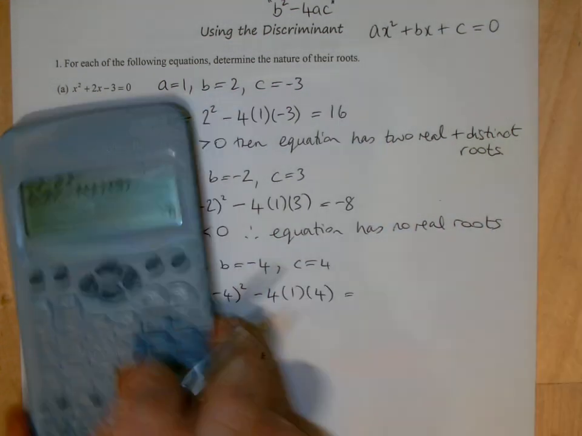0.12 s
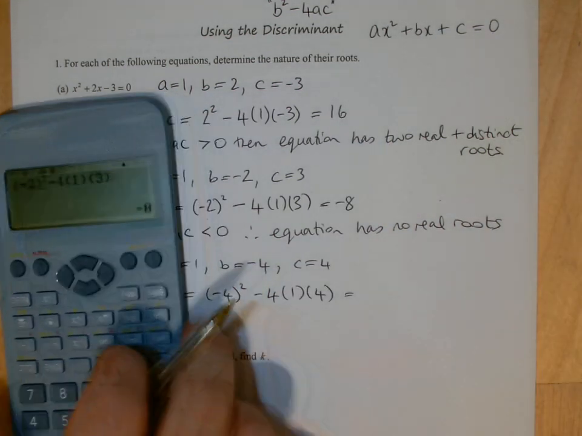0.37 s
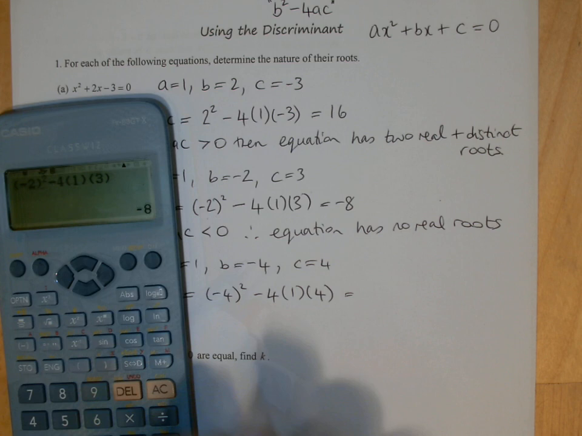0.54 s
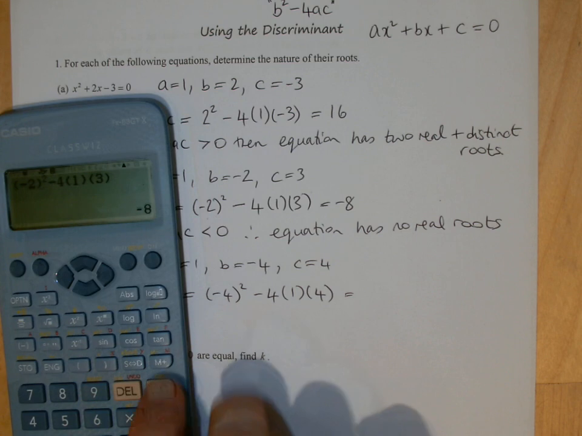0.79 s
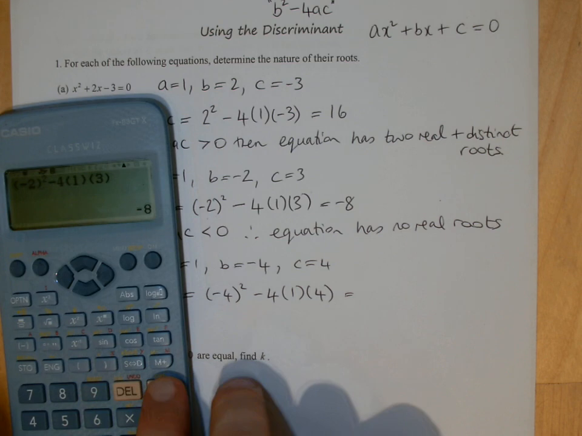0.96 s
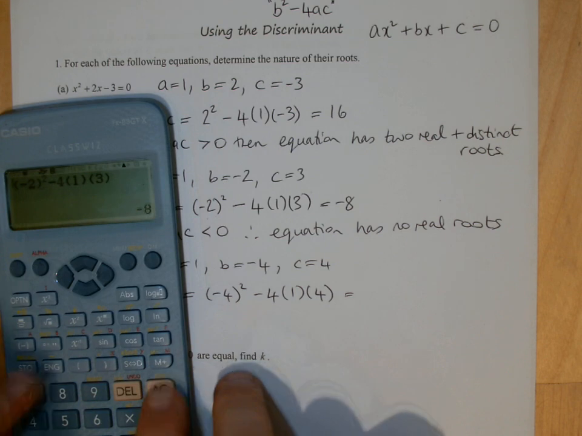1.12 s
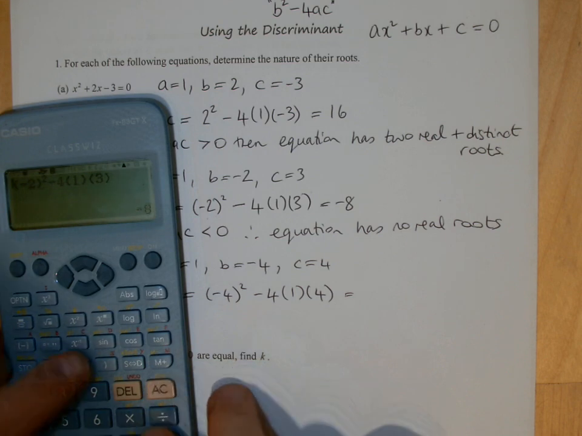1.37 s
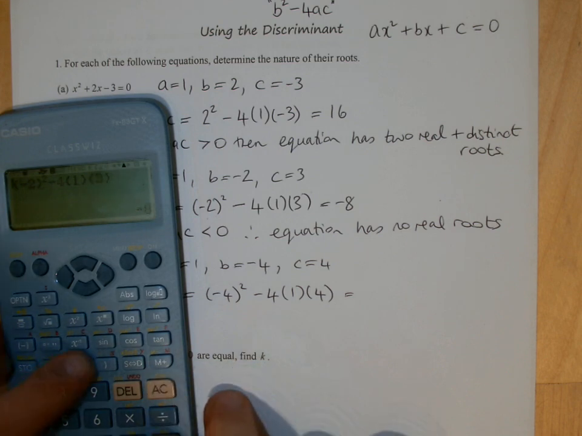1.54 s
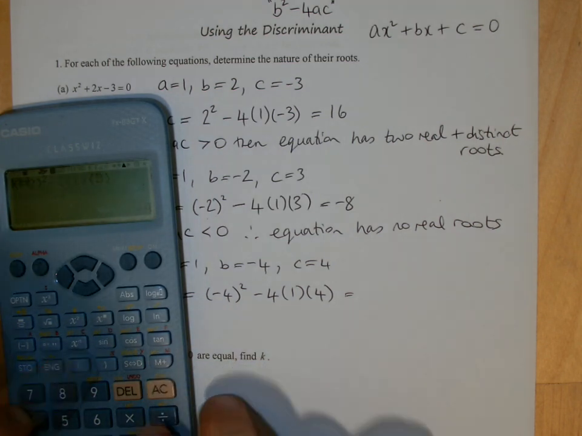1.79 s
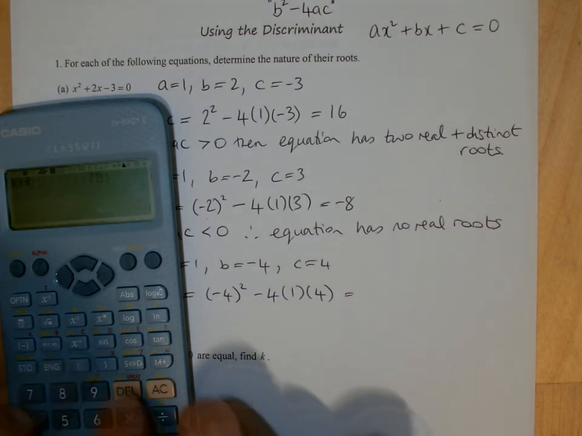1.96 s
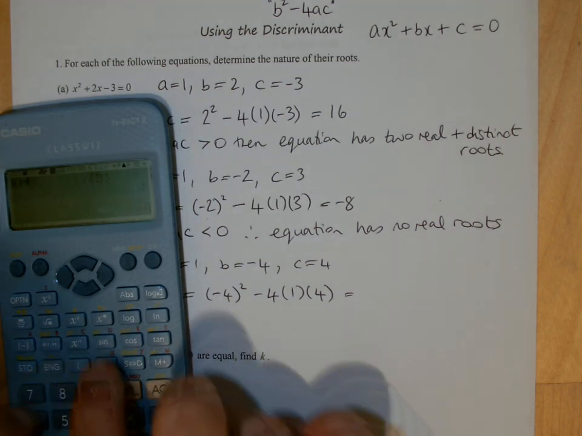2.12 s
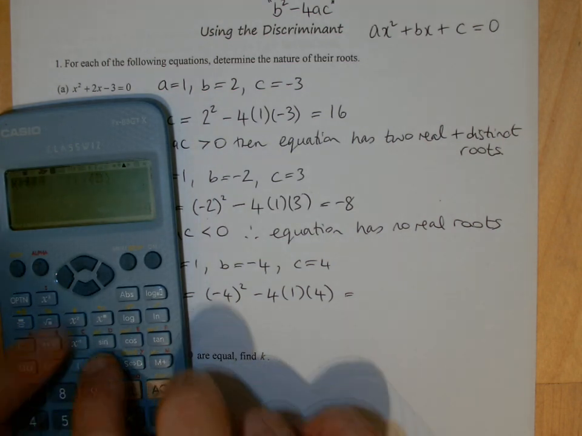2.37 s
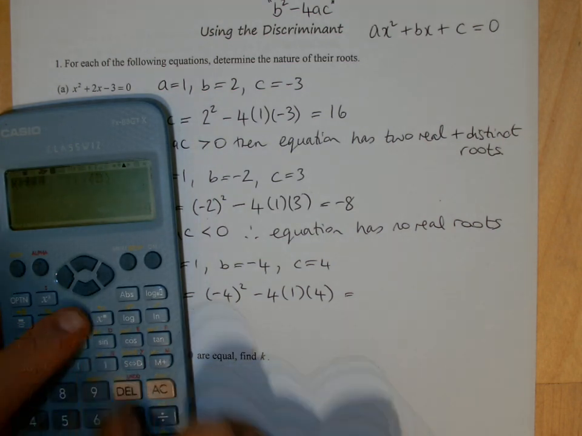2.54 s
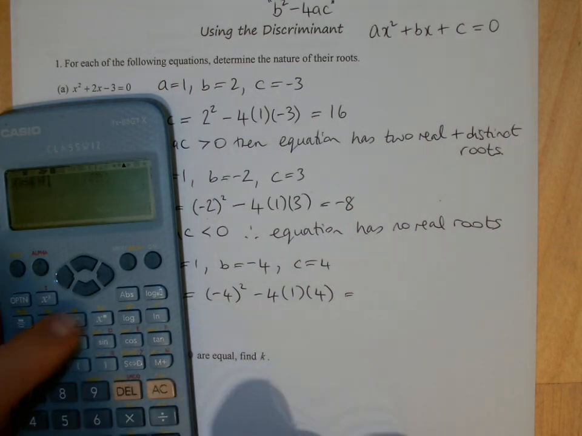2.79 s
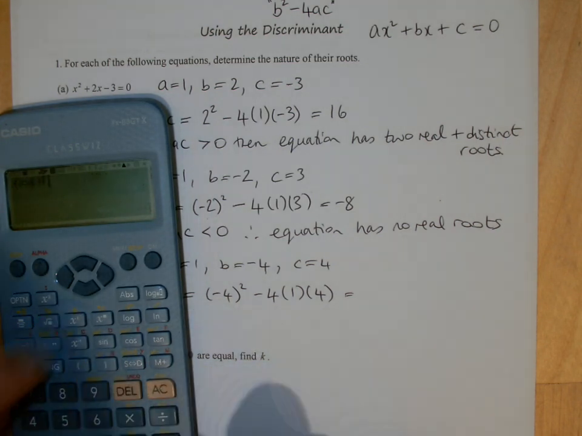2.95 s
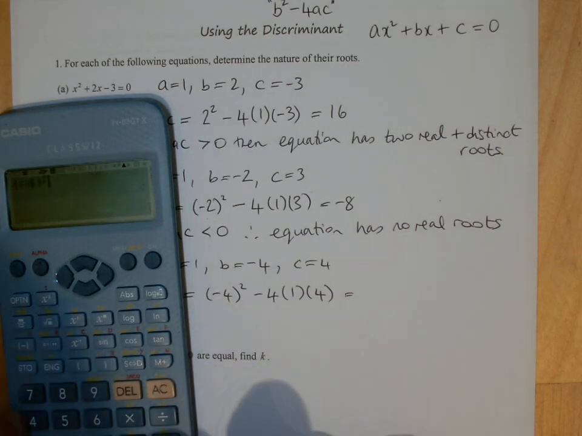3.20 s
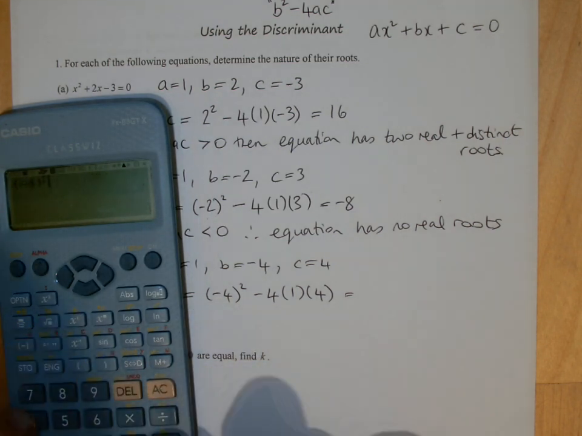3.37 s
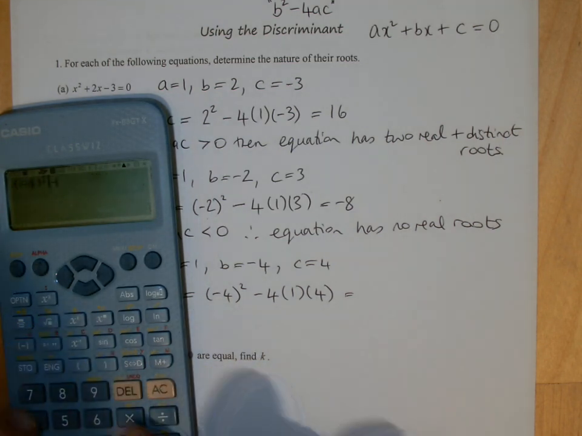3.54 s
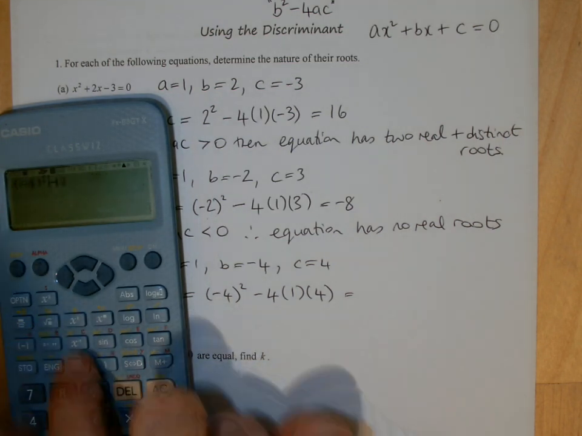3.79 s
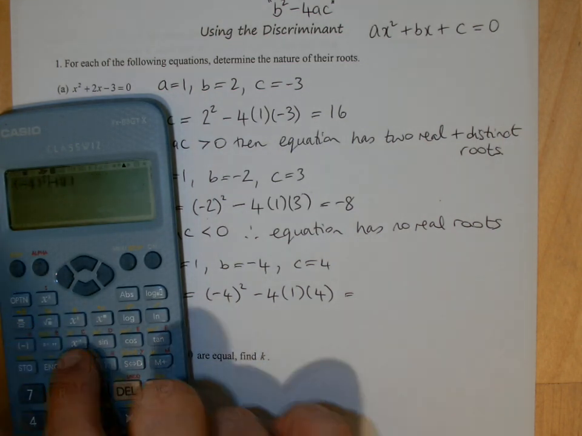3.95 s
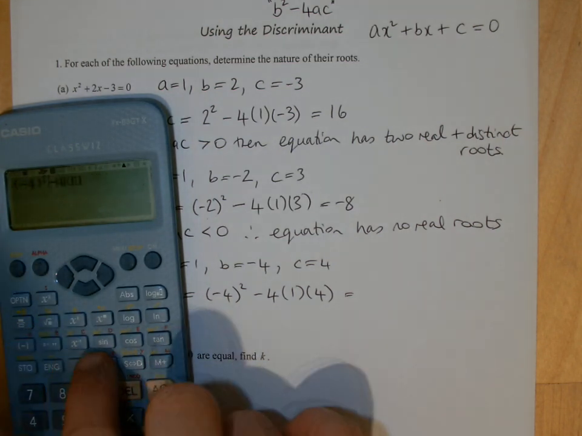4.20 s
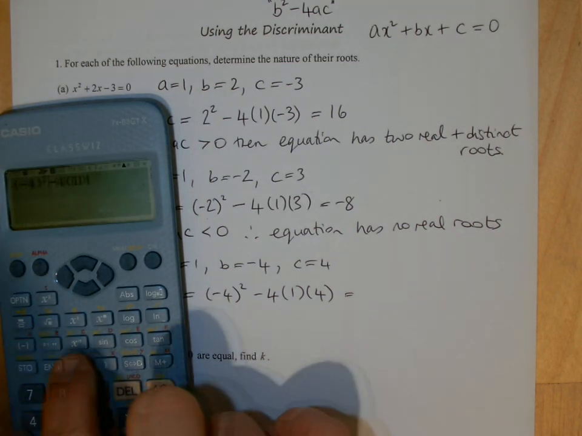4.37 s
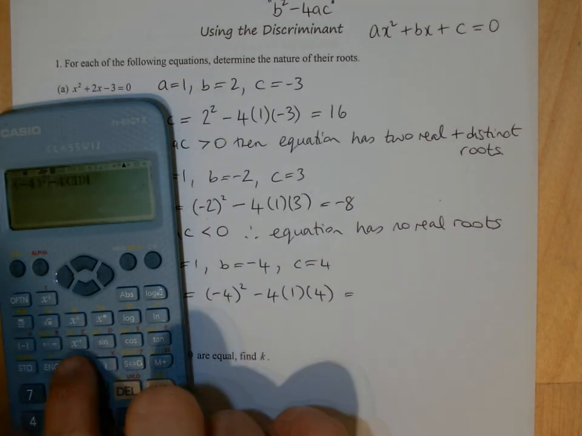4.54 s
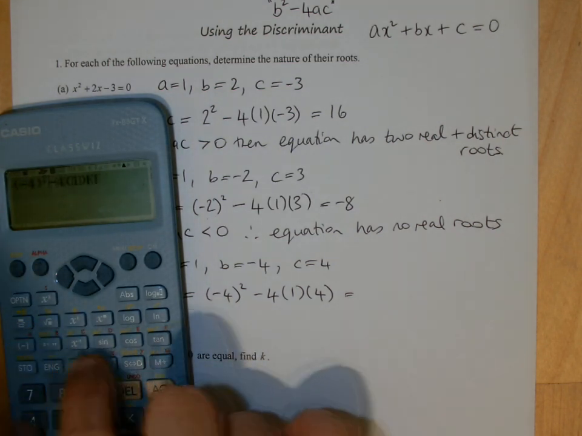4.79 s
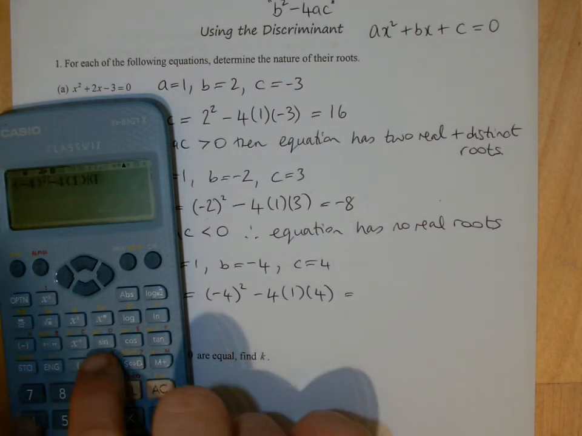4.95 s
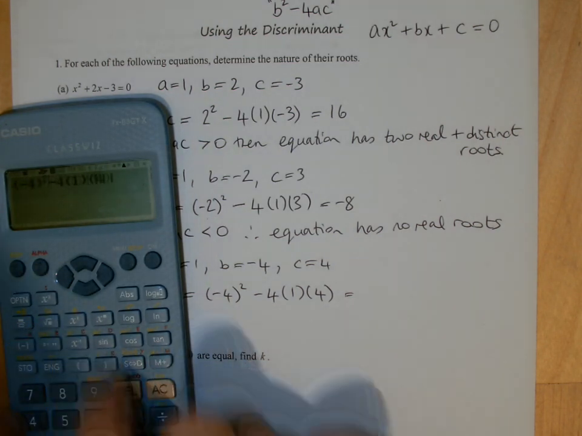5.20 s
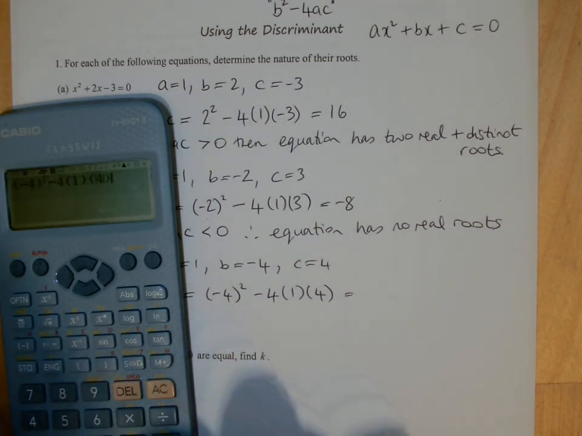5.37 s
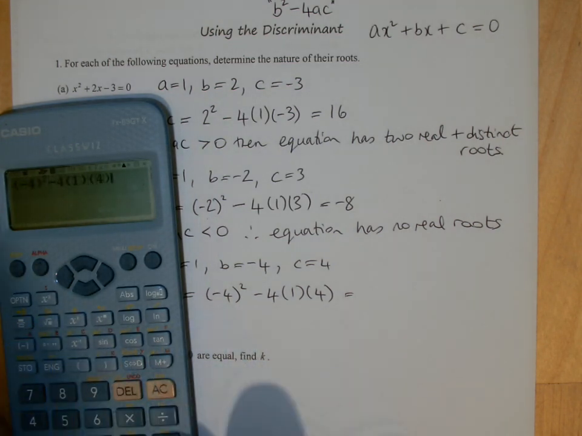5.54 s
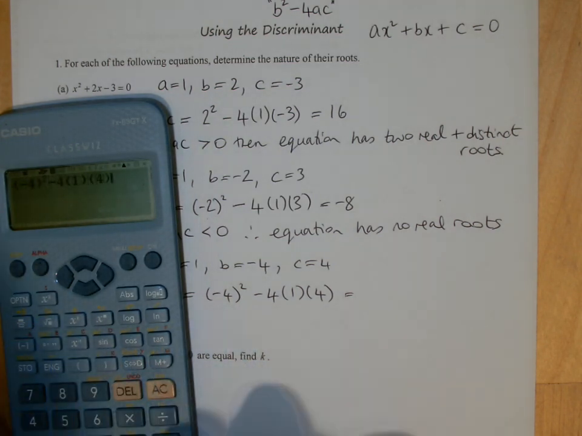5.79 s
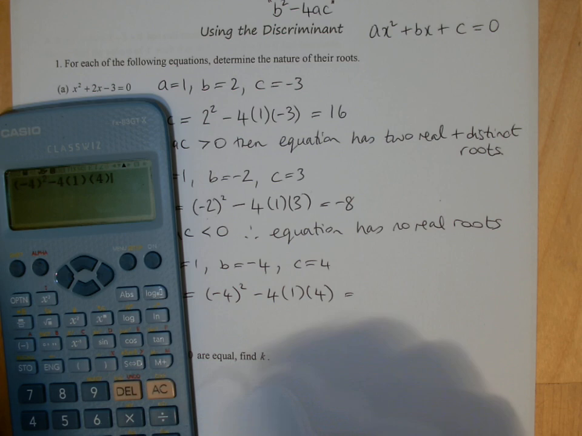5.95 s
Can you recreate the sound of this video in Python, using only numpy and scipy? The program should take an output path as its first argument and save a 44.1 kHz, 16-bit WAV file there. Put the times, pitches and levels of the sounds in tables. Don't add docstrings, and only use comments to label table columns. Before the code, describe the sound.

Close up in a small quiet room, a hard plastic case hits a wooden desk with a bright crack and short woody ring, followed a quarter second later by a lower, gentler thud. After a brief rustle of skin, fingers press cushioned buttons irregularly, giving faint dull bumps and small clicks on release. Soft rumble and steady hiss lie underneath, with a short room echo.

```python
import sys
import numpy as np
from scipy import signal
from scipy.fft import rfft, irfft
from scipy.io import wavfile

SR = 44100
rng = np.random.default_rng(int(sys.argv[2]) if len(sys.argv) > 2 else 0)


def transcribe(u):
    v = np.clip(np.atleast_2d(u).T, -1, 1)
    q = np.round(v * 32767).astype(np.int16)
    wavfile.write(sys.argv[1], SR, q)


N = 265923

# [f/Hz, level per Hz/dB]
FLOOR_SPECTRUM = [(10, -25), (20, 2.5), (64, -5), (130, -11.5), (310, -16), (500, -17.5), (600, -25),
                  (800, -23), (1000, -28), (2000, -32), (5000, -35), (9600, -36), (13000, -36),
                  (15800, -36.5)]
# [f/Hz, level/dB]
WHINES = [(1098, -82), (7989, -86.5), (12129, -101), (13770, -88)]
# [low f/Hz, high f/Hz, level/dB]
HISS_HUMPS = [(10730, 11750, -74), (11270, 11500, -75), (11940, 12300, -81)]
# [f/Hz, time to fall 60 dB/s, level/dB]
ROOM_ECHO = [(100, 0.45, -13), (249, 0.54, -3), (500, 0.37, -1.5), (2000, 0.52, 2), (6000, 0.38, 5.5),
             (15000, 0.13, -0.5)]
# [t of the quickest motion/s, level/dB]
SWEEPS = [
    (0, -58),
    (.3, -63),
    (.85, -64.5),
    (.95, -61.5),
    (1.4, -64.5),
    (3.9, -68),
]
# [f/Hz, level per Hz/dB]
RUSTLE_SPECTRUM = [(500, 8.5), (1500, -4.5), (2500, -1), (4500, -9), (6000, -10.5), (8500, -13.5),
                   (11000, -3.5), (16000, -19)]
# [f/Hz, level under top edge/dB, level under base/dB, level under finger/dB, time to fall 60 dB/s]
DESK_MODES = [(88.8, -2.5, -10.5, -25, 0.27), (117, -32, -9, -36, 0.12), (170.7, -17.5, -2.5, 1.5, 0.2),
              (232, -17, -23, -1.5, 0.044), (248.7, -16, -25, -10.5, 0.26), (315, -9, -9, -21, 0.1),
              (354.6, -16, -19, -7, 0.1), (419.3, -3.5, -6.5, -8.5, 0.14), (442.3, 1, -22, -1, 0.051),
              (522.3, -4, -1.5, -5, 0.1), (575, -32, -29, -33, 0.014), (725, -5, -9.5, -23, 0.063),
              (902, -4.5, 1, -4, 0.033), (967.7, -25.5, -18, -30, 0.15), (1100, -10, -7.5, -22, 0.039),
              (1280, -25, -34, -24, 0.017), (1540, -26, -26, -39, 0.043), (1910, -6.5, -15.5, -22, 0.023),
              (2485, -12.5, -13.5, -15, 0.022), (3900, -41, -7.5, -24, 0.018)]
# [t/s, blow level/dB, hardness f/Hz, crack level/dB]
EDGE_CONTACTS = [
    (.1235, -50.5, 2000, -49),
    (.1426, -14, 5000, -27),
    (.1443, -35, 5000, -26),
    (.1482, -14.5, 470, -61),
    (.156, -28.5, 430, -47),
]
# [t/s, blow level/dB, hardness f/Hz, crack level/dB]
BASE_CONTACTS = [
    (.3735, -47, 3000, -54),
    (.377, -34, 200, -70),
    (.3837, -20.5, 1800, -52),
    (.3868, -57, 3000, -28),
    (.392, -20, 397, -37),
    (.3965, -21.5, 410, -36),
    (.408, -37, 400, -51),
]
# [f/Hz, level per Hz/dB]
THUD_SPECTRUM = [(60, -7), (200, 15), (600, 9.5), (1200, -3.5), (2500, -15), (5000, -36), (16000, -105)]
# [f/Hz, level per Hz/dB]
CRACK_SPECTRUM = [(500, 8.5), (1500, -4.5), (3000, 1), (5000, -5.5), (8000, -9), (12000, -10), (16000, -30)]
# [t/s, thump level/dB, whole desk's sag level/dB, bottoming knock level/dB]
PUSHES = [(0.872, -45.5, -70, -64), (1.026, -60, -73, -80), (1.454, -41.5, -57, -52.5),
          (1.622, -54, -53, -63), (2.06, -47, -46.5, -50.5), (2.233, -44, -58, -62), (2.265, -45, -51, -48),
          (2.362, -48.5, -64, -71), (2.598, -47, -58, -66), (3.072, -52.5, -59, -72),
          (3.629, -43, -56, -73), (3.614, -47, -52, -52.5), (3.707, -56.5, -52.5, -79),
          (3.84, -42.5, -44.5, -48), (4.182, -43.5, -54, -56), (4.586, -43.5, -70, -53),
          (4.72, -55, -56.5, -79), (4.901, -56.5, -47, -54), (5.058, -45.5, -60, -54),
          (5.165, -48.5, -47.5, -81)]
# [t/s, tick level/dB, knock level/dB, cap f/Hz]
RELEASES = [(1.0157, -46, -50, 2700), (1.04, -47, -55, 2450), (1.344, -48, -55, 2660),
            (1.5693, -46, -48.5, 1590), (1.7281, -58, -50, 2700), (1.7602, -58, -67, 2400),
            (2.168, -53.5, -52, 1620), (2.1894, -56, -52.5, 1970), (2.366, -47, -50, 1950),
            (2.7206, -48, -51.5, 2700), (2.7352, -43.5, -55, 2520), (3.712, -55, -54.5, 2590),
            (3.7294, -61, -75, 1900), (3.9576, -50, -48.5, 2800), (3.9815, -58, -83, 2080),
            (4.2774, -55, -57, 2470), (4.295, -44.5, -50, 2280), (4.7165, -53, -45.5, 2540),
            (5.164, -46, -58, 1580), (5.1639, -45.5, -46, 1950)]
# [t/s, tick level/dB, knock level/dB, cap f/Hz]
TOUCHES = [(0.5488, -65, -75, 2120), (0.816, -49, -50, 2370), (1.3895, -64, -53, 2330),
           (3.0494, -45, -54.5, 2170), (3.0579, -47, -47, 2490), (3.1835, -46, -48.5, 1460),
           (3.2724, -52, -52, 2500), (3.3843, -55, -55, 2540), (3.428, -66, -49, 2200),
           (4.122, -49, -53, 2530), (4.2353, -52.5, -77, 4730), (4.7987, -55, -56, 2510),
           (4.999, -47, -44.5, 2610), (5.472, -60, -53, 1510), (5.5197, -70, -54.5, 1660)]
# [f/Hz, level/dB, time to fall 60 dB/s]
CAP_MODES = [(1170, -2, 0.055), (1600, -28.5, 0.0097), (1950, -11.5, 0.061), (2320, 3, 0.04),
             (2700, -4, 0.04), (3220, -7, 0.015), (3680, 9, 0.0099), (5020, -11.5, 0.033),
             (5540, 9, 0.0033), (7300, 14, 0.0039), (10030, 12, .008)]
# [f/Hz, level per Hz/dB]
CAP_CRACK_SPECTRUM = [(500, -6), (1500, 4.5), (3000, -5.5), (5000, -4.5), (7000, -21), (11000, -29),
                      (16000, -22)]
# [f/Hz, level per Hz/dB]
CASE_SPECTRUM = [(100, -8), (250, 7), (450, -3.5), (900, -12), (1300, -21), (3000, -30)]


def from_db(db):
    return 10 ** (np.asarray(db) / 20)


def rms_one(x):
    return x / np.sqrt(np.mean(x ** 2) + 1e-20)


def at_hz(points, hz):
    points = np.array(points)
    return np.interp(np.log(hz + 1), np.log(points[:, 0]), points[:, 1])


def coloured(spectrum):
    hz = np.fft.rfftfreq(N, 1 / SR)
    white = rfft(rng.standard_normal(N))
    return rms_one(irfft(white * from_db(at_hz(spectrum, hz)), N))


def band_pass(low_hz, high_hz):
    return signal.butter(2, [low_hz, high_hz], "band", fs=SR, output="sos")


def drift(points_per_s):
    points = rng.standard_normal(int(points_per_s * N / SR) + 2)
    return np.interp(np.arange(N) / SR * points_per_s, np.arange(len(points)), points)


def ring(force, hz, t60):
    r = from_db(-60 / (t60 * SR))
    w = 2 * np.pi * hz / SR
    return signal.lfilter([0, np.sin(w)], [1, -2 * r * np.cos(w), r * r], force + 1e-18)


def blows(times, gains, hardness_hz):
    force = np.zeros(N + SR)
    for s, gain, hz in zip(times, gains, hardness_hz):
        size = int(SR / hz / 2) + 2
        push = np.sin(np.pi * np.arange(1, size) / size) ** 2
        start = int(s * SR)
        force[start:start + size - 1] += gain * push / push.sum()
    return force[:N]


def cracks(times, level_db, t60, spectrum, rise_s=0.00013):
    clicks = np.zeros(N)
    clicks[(times * SR).astype(int)] = from_db(level_db)
    swell = np.exp(-1 / (rise_s * SR))
    fall = signal.lfilter([1], [1, -from_db(-60 / (t60 * SR))], clicks + 1e-18)
    return coloured(spectrum) * signal.lfilter([1 - swell], [1, -swell], fall)


def floor():
    humps = np.zeros(N)
    for low_hz, high_hz, db in HISS_HUMPS:
        hump = signal.sosfilt(band_pass(low_hz, high_hz), rng.standard_normal(N))
        humps += from_db(db) * rms_one(hump)
    flicker = from_db(0.8 * drift(9))
    t = np.arange(N) / SR
    whines = sum(np.sqrt(2) * from_db(db) * np.sin(2 * np.pi * hz * t) for hz, db in WHINES)
    return from_db(-54.5) * coloured(FLOOR_SPECTRUM) + flicker * humps + whines


def room(x):
    t = np.arange(SR // 2) / SR
    tail = np.zeros(len(t))
    levels = np.array(ROOM_ECHO)[:, ::2]
    for hz in 62 * 2 ** np.arange(8):
        octave = signal.sosfilt(band_pass(hz / np.sqrt(2), hz * np.sqrt(2)), rng.standard_normal(len(t)))
        tail += octave * from_db(at_hz(levels, hz) - 60 * t / at_hz(ROOM_ECHO, hz))
    tail = tail * np.clip(t / 0.0085, 0, 1)
    return signal.fftconvolve(x, tail / np.sqrt(np.sum(tail ** 2)))[:N]


def brushing():
    fade_db_per_s, resting_hand_db = 40, -72.5
    t = np.arange(N) / SR
    motion_db = np.max([db - fade_db_per_s * np.abs(t - s) for s, db in SWEEPS], axis=0)
    rub = rng.standard_normal(N)
    body = sum(ring(rub, hz, t60) * from_db(edge_db) for hz, edge_db, base_db, key_db, t60 in DESK_MODES[6:])
    return from_db(np.maximum(motion_db, resting_hand_db)) * (rms_one(body) + coloured(RUSTLE_SPECTRUM))


def desk(times, level_db, hardness_hz, column, spread_db, rise):
    luck = rng.standard_normal((len(times), len(DESK_MODES)))
    out = np.zeros(N)
    end = min(N, int((max(times) + 1) * SR))
    for k, mode in enumerate(DESK_MODES):
        hz, t60 = mode[0], mode[-1]
        gains = from_db(level_db + mode[column] + spread_db * luck[:, k]) * (-1) ** k
        force = blows(times, gains, hardness_hz)[:end]
        out[:end] += ring(force, hz, t60) - ring(force, hz, rise / hz)
    return out


def landing(contacts, column):
    s, blow_db, hardness_hz, crack_db = np.transpose(contacts)
    modes = desk(s, blow_db, hardness_hz, column=column, spread_db=2.0, rise=5.6)
    thud = cracks(s, blow_db - 11, 0.091, THUD_SPECTRUM, rise_s=0.0015)
    return modes + thud + cracks(s, crack_db, 0.013, CRACK_SPECTRUM)


def cap_contacts():
    landings = [(s + 0.00302, knock_db - 26, knock_db, 1640) for s, thump_db, sag_db, knock_db in PUSHES]
    return np.vstack([RELEASES, TOUCHES, landings]).T


def case_thuds():
    s, tick_db, knock_db, cap_hz = cap_contacts()
    return cracks(s + 0.0018, knock_db - 5.5, 0.1, CASE_SPECTRUM, rise_s=0.0016)


def rattles(times, level_db, length_s, count):
    luck = rng.random((len(times), 2, count))
    later = np.arange(count) > 0
    at = times[:, None] + length_s * luck[:, 0] * later
    touch_db = level_db[:, None] - 7.0 - 15.0 * luck[:, 1] * later
    return at.ravel(), touch_db.ravel()


def own_modes(s, tick_db, cap_hz):
    out = np.zeros(N)
    t = np.arange(SR // 20) / SR
    level_db = -52 + 0.48 * (tick_db + 52)
    for start, db, hz in zip((s * SR).astype(int), level_db, cap_hz):
        swell = np.clip(t / 0.0019, 0, 1)
        out[start:start + len(t)] += from_db(db - 60 * t / 0.016) * np.sin(2 * np.pi * hz * t) * swell
    return out


def keys():
    s, tick_db, knock_db, cap_hz = cap_contacts()
    knocks = desk(s + 0.00306, knock_db + 7.0, np.full(len(s), 1200.), column=3, spread_db=4.0, rise=17.0)
    knocks = signal.sosfilt(signal.butter(2, 330, "high", fs=SR, output="sos"), knocks)
    at, touch_db = rattles(s, tick_db, length_s=0.0071, count=6)
    luck = rng.standard_normal((len(at), len(CAP_MODES)))
    snap_hz, graze_hz = 9000, 2300
    is_release = np.arange(len(s)) < len(RELEASES)
    hardness_hz = np.repeat(np.where(is_release, snap_hz, graze_hz), 6)
    ticks = np.zeros(N)
    for k, (hz, db, t60) in enumerate(CAP_MODES):
        gains = from_db(touch_db + db - 12.0) * luck[:, k]
        ticks += ring(blows(at, gains, hardness_hz), hz, t60)
    ticks += own_modes(s, tick_db, cap_hz)
    return knocks + ticks + cracks(at, touch_db - 6.5, 0.019, CAP_CRACK_SPECTRUM)


def pushes():
    s, thump_db, sag_db, knock_db = np.transpose(PUSHES)
    fingertip_hz = np.full(len(s), 122.4)
    period = 1 / DESK_MODES[2][0]
    steps = np.r_[s - period, s] + 0.00011
    step_db = np.r_[thump_db + 1.5, thump_db - 1.5]
    thumps = desk(steps, step_db, np.tile(fingertip_hz, 2), column=3, spread_db=3.0, rise=1.8)
    sag = ring(blows(s, from_db(sag_db + 6.5), fingertip_hz), DESK_MODES[0][0], t60=0.089)
    return thumps + sag


def scene():
    set_down = landing(EDGE_CONTACTS, column=1) + landing(BASE_CONTACTS, column=2)
    near = set_down + pushes() + keys() + brushing()
    return (near + from_db(-11) * room(near) + floor() + case_thuds())[None]


def roll_off(x):
    return signal.sosfilt(signal.butter(12, 16300, fs=SR, output="sos"), x)


def record(dry):
    top_cut = signal.ellip(12, 0.3, 90, 15640, fs=SR, output="sos")
    mix = signal.sosfilt(top_cut, dry)
    return roll_off(mix)


dry = scene()
out = record(dry)
transcribe(out)
```